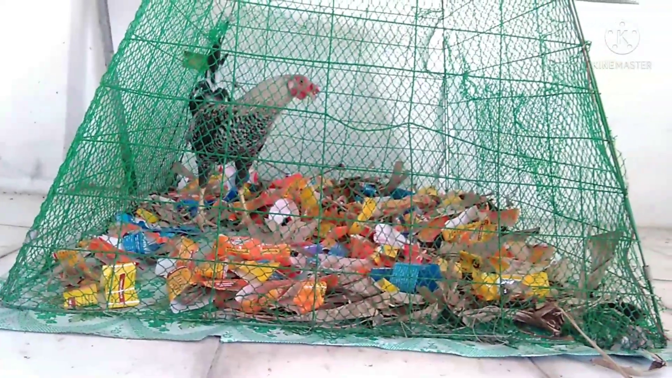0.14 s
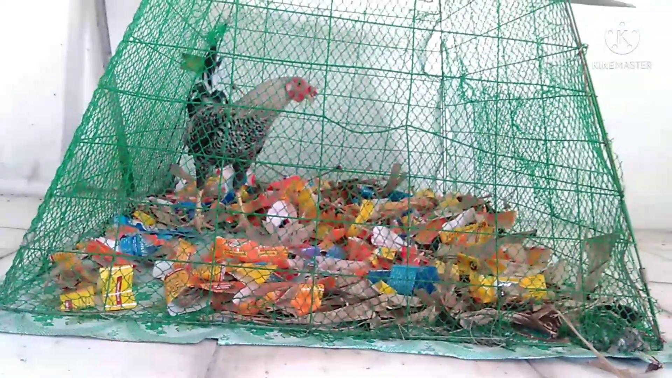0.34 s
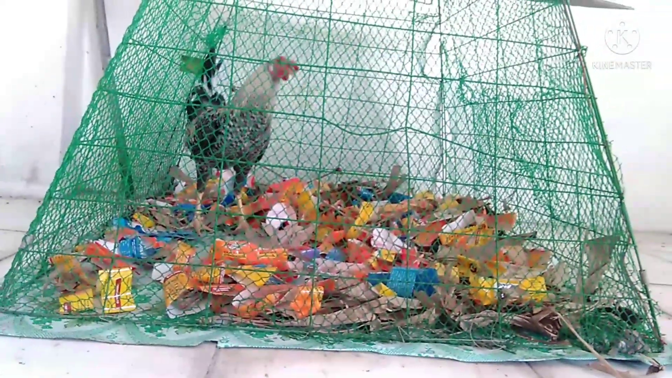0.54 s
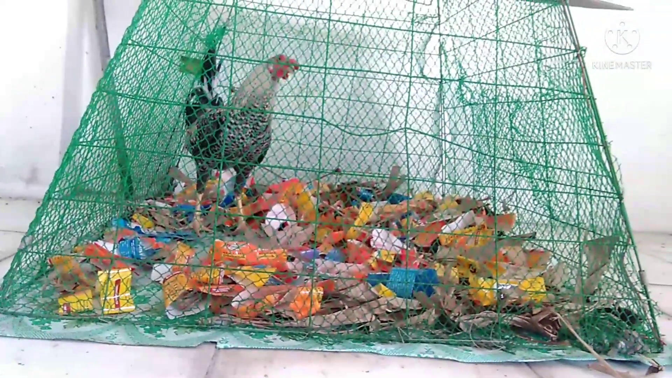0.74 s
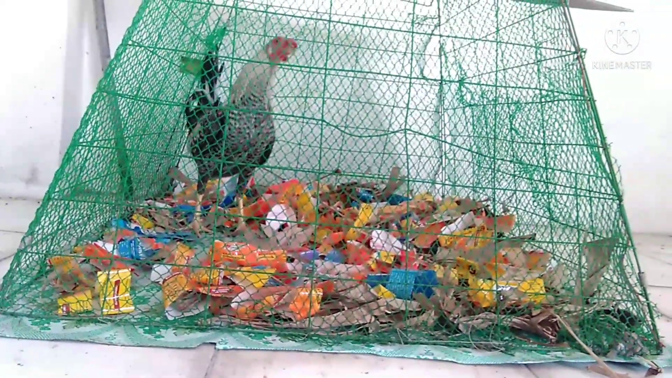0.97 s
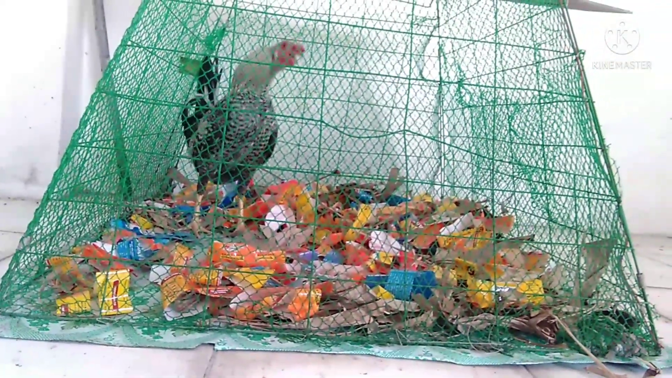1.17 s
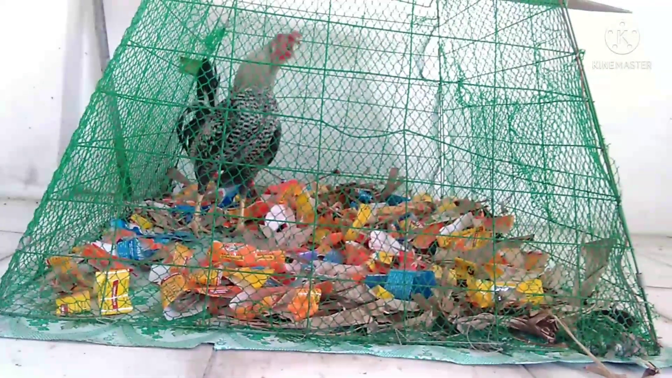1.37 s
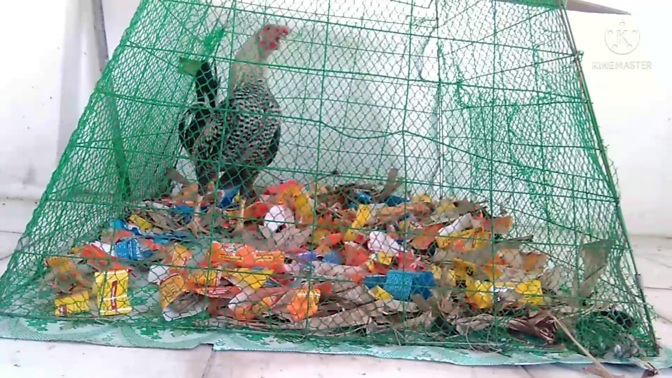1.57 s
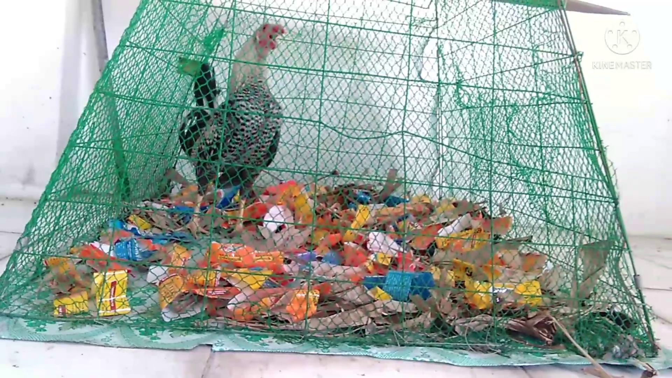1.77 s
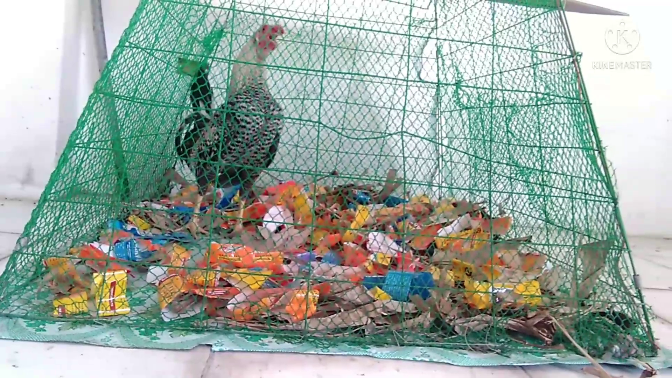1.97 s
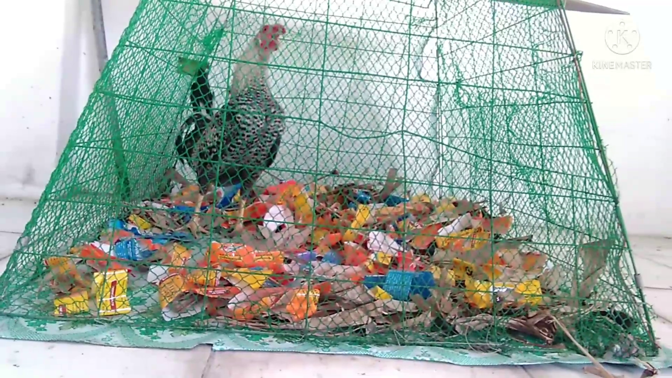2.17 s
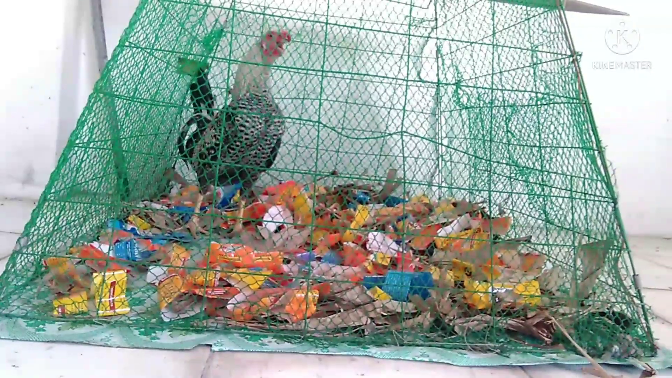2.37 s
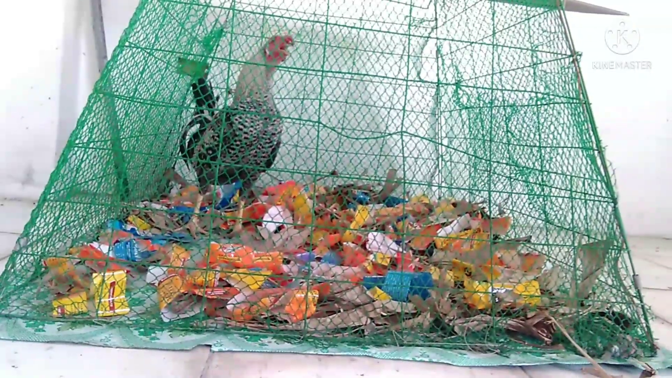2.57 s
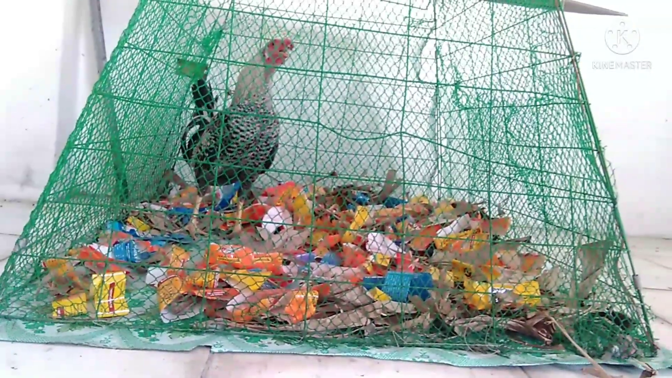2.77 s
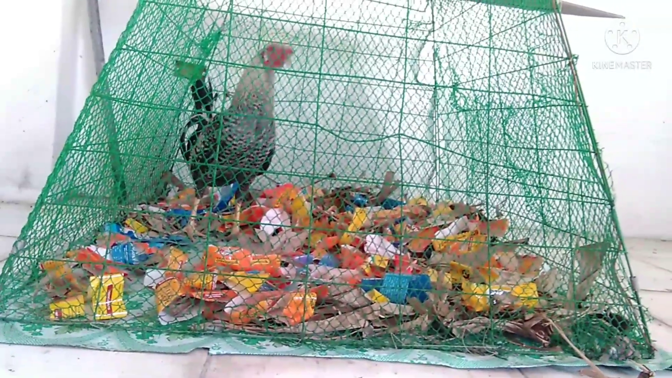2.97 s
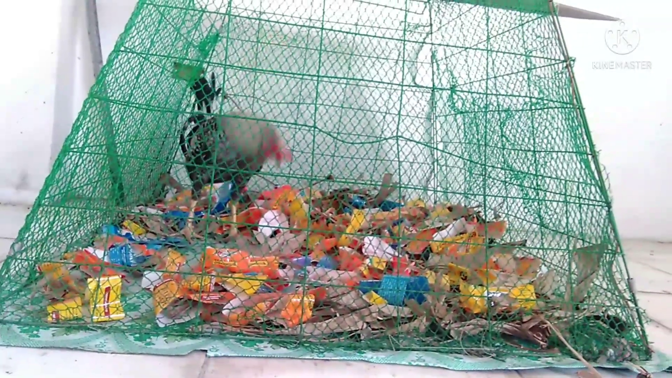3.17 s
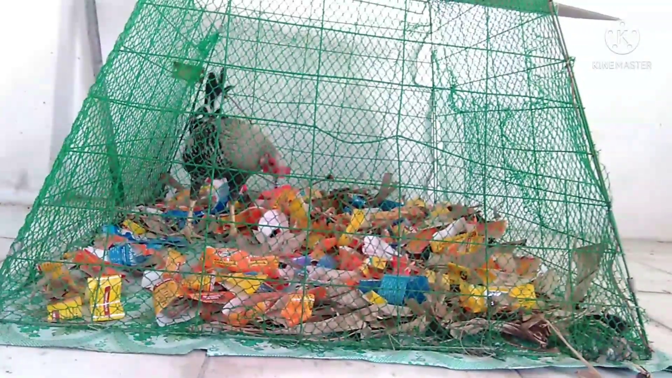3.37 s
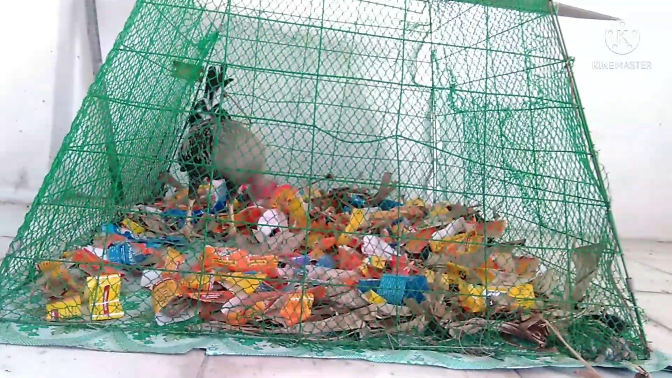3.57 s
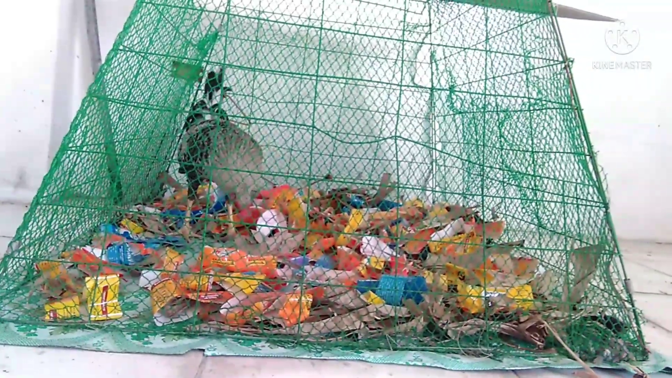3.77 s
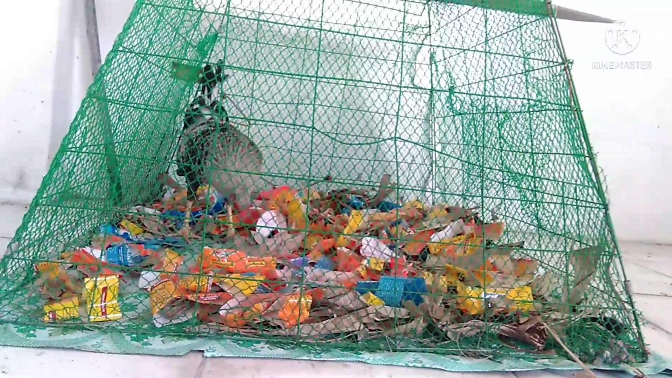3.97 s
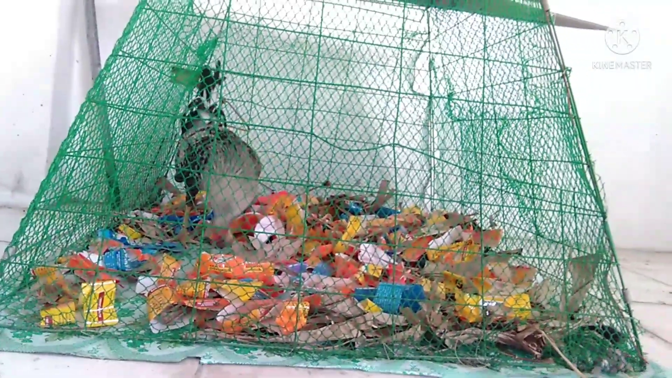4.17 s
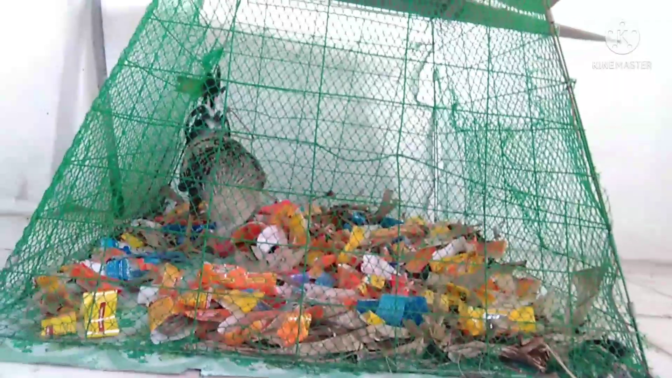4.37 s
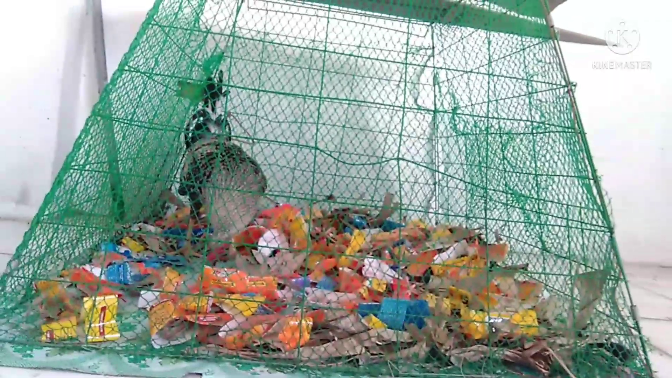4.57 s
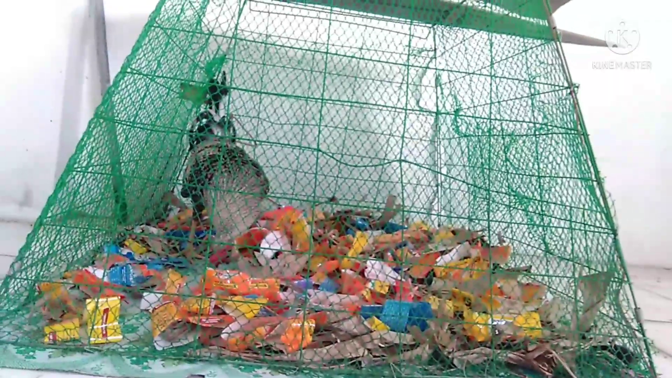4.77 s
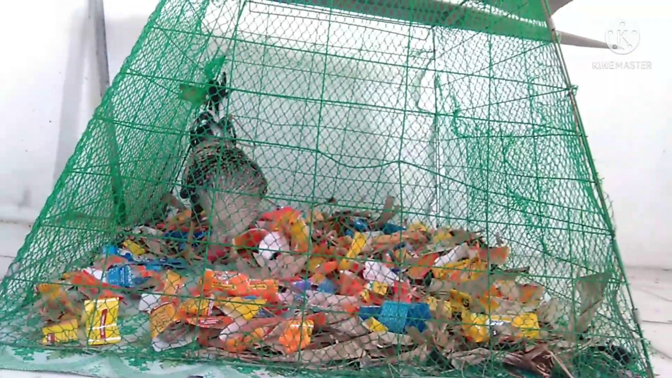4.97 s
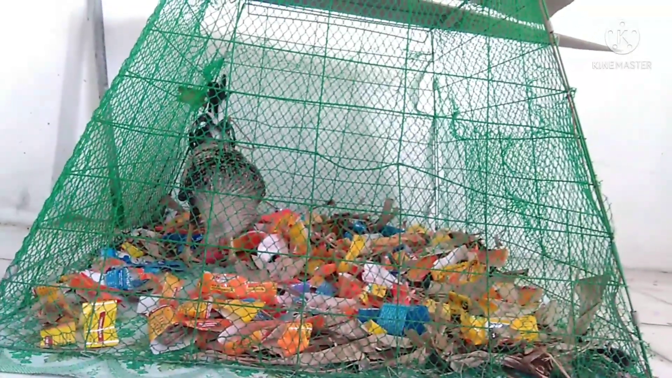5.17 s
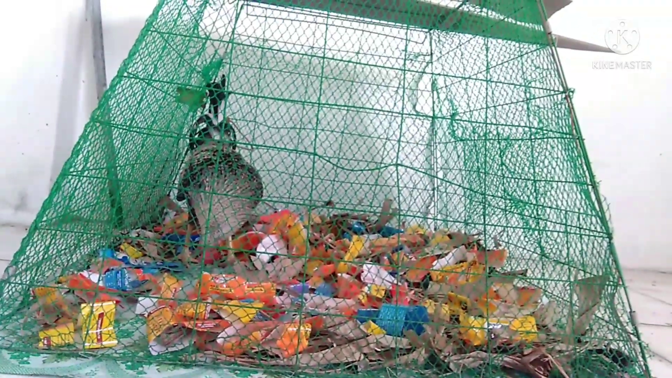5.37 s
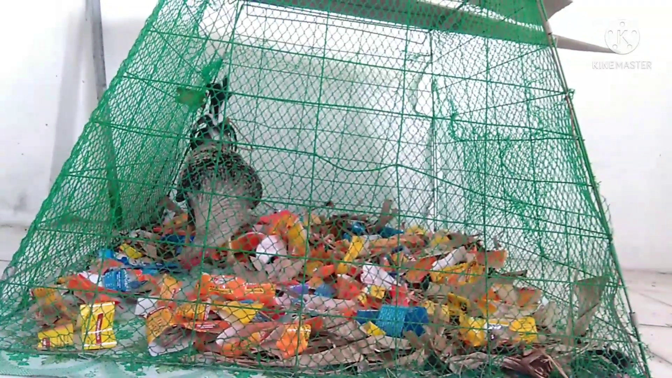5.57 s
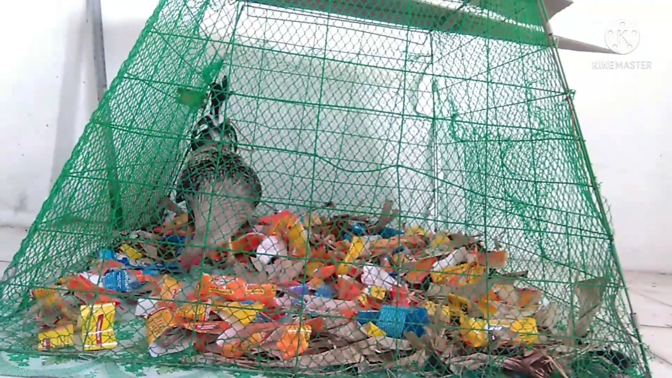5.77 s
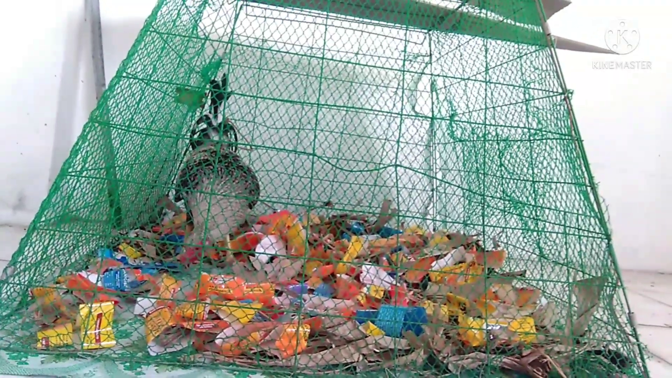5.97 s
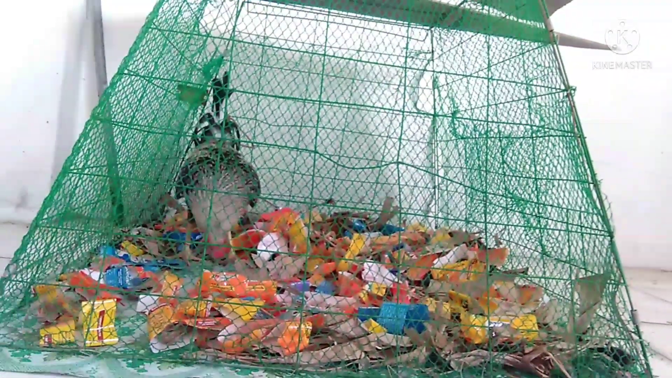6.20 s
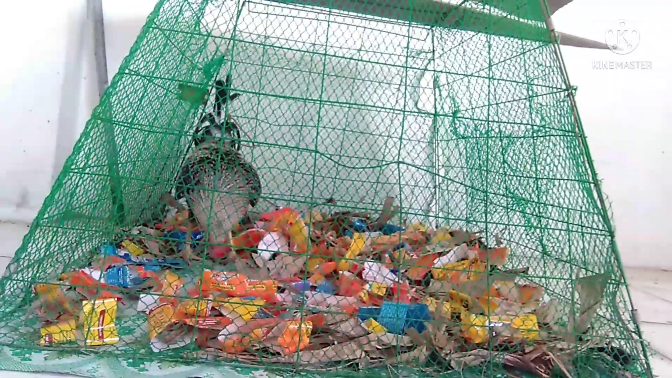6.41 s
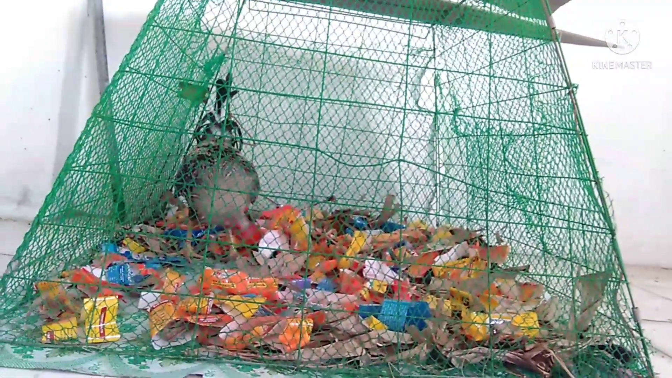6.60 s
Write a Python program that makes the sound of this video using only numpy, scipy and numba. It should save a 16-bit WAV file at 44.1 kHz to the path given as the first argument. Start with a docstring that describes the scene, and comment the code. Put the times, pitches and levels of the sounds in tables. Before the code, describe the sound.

After three tiny far bird chirps, one raspy, pitch-jumping rooster crow echoes around a hard-walled yard above steady low hum and airy wash.

```python
"""Rooster crowing in a hard-walled yard

A rooster in a wire pen crows once, a few metres from a phone, over a low hum and distant traffic wash.
Its syrinx sends partials through fixed throat resonances; notes jump in pitch, some hoarse, one long trill.
Decaying noise echoes from the walls blur them. A small far bird chirps first, as gliding sines, and faint
wavering tones come after the crow. The phone slightly lowers quiet sound, limits peaks and cuts the top."""
import sys
import numpy as np
from scipy import signal
from scipy.fft import rfft, irfft, next_fast_len
from scipy.io import wavfile
from scipy.ndimage import uniform_filter1d
from numba import njit

SR = 44100
rng = np.random.default_rng(int(sys.argv[2]) if len(sys.argv) > 2 else 0)


def dump(signal):
    """Clip the signal to [-1, 1] and save it as 16-bit WAV at the path in sys.argv[1]."""
    limited = np.clip(np.atleast_2d(signal).T, -1, 1)
    pcm = np.round(limited * 32767).astype(np.int16)
    wavfile.write(sys.argv[1], SR, pcm)


N = 292912
SIZE = next_fast_len(2 * N)  # padded transform length
HZ = np.fft.rfftfreq(SIZE, 1 / SR) + 1e-9  # never zero, so that its logarithm exists


def undb(db):
    """Amplitude ratio: each 20 dB is a factor of ten."""
    return 10 ** (np.asarray(db) / 20)


def level(x, db):
    """Root-mean-square level: scale a signal to a given effective amplitude."""
    return x * undb(db) / np.sqrt(np.mean(x ** 2))


def on_hz(table):
    """Spectral interpolation: join (Hz, value) points on a log-frequency axis."""
    hz, value = np.transpose(table)
    return np.interp(np.log(HZ), np.log(hz), value)


def colour(x, gain):
    """Linear filtering: convolution in time is multiplication in frequency."""
    return irfft(rfft(x, SIZE) * gain, SIZE)[..., :N]


def walk(rate):
    """Band-limited chance: twice-averaged noise of unit rms that changes about rate times a second."""
    k = max(int(SR / rate), 1)
    smooth = uniform_filter1d(uniform_filter1d(rng.standard_normal(N), k), k)
    return level(smooth, 0)


def bands(count, lo_hz, hi_hz):
    """Filter bank: overlapping triangles on a log-frequency axis that add up to one."""
    centres = np.geomspace(lo_hz, hi_hz, count)
    weights = [np.interp(np.log(HZ), np.log(centres), row) for row in np.eye(count)]
    return list(zip(centres, weights))


@njit
def follow(x, attack, release):
    """Envelope detection: a one-pole smoother with separate rates for rise and fall."""
    e, out = 0., np.empty(len(x))
    for i in range(len(x)):
        e += (x[i] - e) * (attack if x[i] > e else release)
        out[i] = e
    return out


def town():
    """Partial coherence: hum and wash reach the right port first; above the bass they grow diffuse."""
    # Spectrum of hum and wash. Each row: frequency in Hz, relative density in dB.
    town_spectrum = [(15, -65), (25, -36), (40, -31), (52, -24), (62, -14.5), (87, -8), (136, -8),
                     (285, -13), (335, -10), (436, -14.5), (740, -9.5), (891, -13.5), (1130, -8.5),
                     (1550, -18), (3170, -27), (4030, -36.5), (9150, -47.5), (14000, -60.5)]
    # Denser regions of hum and wash. Each row: centre in Hz, width in Hz, added density in dB.
    dense_regions = [(94.6, 5.5, 4.5), (136.7, 17, 7.5), (1094, 27.5, 5.5), (2130, 680, 7),
                     (3450, 230, 2.5)]
    # Band levels; the treble dips early and all is fuller later.
    # Each row: time in seconds, then relative bass, middle, treble and top level in dB.
    band_levels = [(0, -4, -20, -6.5, 6.5), (.33, -3.5, -19.5, -15.5, 1.5), (.47, -4, -20, -24, -13),
                   (.75, -5, -22, -30, -9), (.95, -4, -22.5, -14, -7.5), (2.4, -10.5, -14.5, -12, 7),
                   (3.1, -1.5, -19.5, -2.5, 7), (4.002, -3.5, -15, -1.5, 5.5), (4.85, -3, -11.5, 1.5, 5.5),
                   (5.149, 0, -14.5, 1, 7), (5.8, -1.5, -11, 2.5, 7), (6.2, -0.5, -12, 3, 8),
                   (6.64, 0, -12, 3.5, 9.5)]
    # Frequencies in Hz to which those four levels belong.
    level_hz = [173, 1760, 4050, 9000]
    lag = 16  # samples by which the left port hears the shared part later
    shape_db = on_hz(town_spectrum)
    for hz, width, db in dense_regions:
        shape_db = shape_db + db * np.exp(-.5 * ((HZ - hz) / width) ** 2)
    aimed, left, right = rng.standard_normal((3, N))
    # share of the power common to both ports
    coherent = np.clip(on_hz([(200, 1.0), (700, 0.69), (2000, 0.059), (9000, 0.028)]), 0, 1)
    shared = rfft([np.roll(aimed, lag), aimed], SIZE) * np.sqrt(coherent)
    diffuse = rfft([left, right], SIZE) * np.sqrt(1 - coherent)
    both = (shared + diffuse) * undb(shape_db)
    both = both * undb(-24) / np.std(irfft(both, SIZE)[:, :N])  # rms before the band levels
    seconds, *columns = np.transpose(band_levels)
    out = 0
    for centre, weight in bands(count=14, lo_hz=40.0, hi_hz=10300):
        db = [np.interp(np.log(centre), np.log(level_hz), row) for row in np.transpose(columns)]
        flicker_db = 0.97 * walk(5.3)
        gain = undb(np.interp(np.arange(N) / SR, seconds, db) + flicker_db)
        out = out + irfft(both * weight, SIZE)[:, :N] * gain
    return out


def chirps():
    """Frequency glide: short soft sine whistles of a small far bird sag a little under a half-sine swell."""
    # Each row: start in seconds, length in seconds, starting pitch in Hz, peak level in dB.
    whistles = [(0.022, 0.027, 2800, -51), (0.056, .02, 2760, -45), (0.094, 0.04, 2780, -49)]
    t, out = np.arange(N) / SR, 0
    for start, length, hz, db in whistles:
        along = np.clip((t - start) / length, 0, 1)
        cycles = hz * np.cumsum(1 - 0.027 * along) / SR
        out = out + undb(db) * np.sin(np.pi * along) * np.sin(2 * np.pi * cycles)
    return out


def trill(t):
    """Frequency modulation: a flattened cosine moves the long note's pitch up and down."""
    # Each row: time in seconds, depth as a share of the pitch.
    trill_depth = [(1.96, 0), (2.02, .025), (2.12, .035), (2.24, .042), (2.35, .03), (2.41, 0)]
    rate_hz, top_s = 28, 2.2  # the pitch is about at its top at top_s
    swing = np.tanh(2 * np.cos(2 * np.pi * rate_hz * (t - top_s) + .5 * walk(12)))
    return np.interp(t, *np.transpose(trill_depth)) * swing


def second_voice(t):
    """Biphonation: a second, lower oscillation sounds in two hoarse early notes."""
    # Each row: start in seconds, end in seconds, pitch in Hz, amplitude share.
    second_notes = [(1.38, 1.49, 779.5, 0.61), (1.58, 1.694, 787.6, 1.28)]
    wobbling_s = np.cumsum(1 + .04 * walk(99)) / SR
    flutter = undb(4 * walk(100))
    out = 0
    for start, end, hz, share in second_notes:
        out = out + share * (t >= start) * (t < end) * flutter * np.cos(2 * np.pi * hz * wobbling_s)
    return out


def overtones(phase, hz, beak_db, rasp, valve):
    """Harmonic series: partials 2 to 17 fall with order; the upper ones flicker and drift separately."""
    shimmer_db, shimmer_rad = 4, 1.0
    odd_db = -0.5  # odd partials are weaker than even ones
    out = 0
    for k in range(2, 18):
        shake = np.clip((k - 3) / 3, 0, 1)
        flicker = undb(shake * shimmer_db * walk(60))
        gain = undb(beak_db - 5.98 * np.log2(k) + odd_db * (k % 2)) * (rasp if k > 2 else 1)
        # the throat spreads the phases by k * k, so the puffs are not spiky
        wave = np.cos(k * phase + k * k + shake * shimmer_rad * walk(136))
        out = out + flicker * valve * gain * wave * (k * hz < 16000)
    return out


def throat(source, t):
    """Source-filter principle: fixed resonances shape the voice, first with the neck bent, then straight."""
    # Neck still bent. Each row: frequency in Hz, gain in dB.
    bent_gain = [(300, -34), (650, -8), (850, 0), (1000, 2.5), (1230, 3), (1450, 17), (1800, 13), (2400, 9),
                 (2700, -26), (3100, -7), (3800, -26), (4600, -6.5), (5700, -1), (7200, -11.5),
                 (8500, -15.5), (11500, -10), (14000, -31)]
    # Neck straight. Each row: frequency in Hz, gain in dB.
    straight_gain = [(300, -60), (650, 1.5), (850, 9), (1200, 10), (1650, 16.5), (2000, 14.5), (2200, 10.5),
                     (2500, -3.5), (2750, 5), (3100, -7.5), (3350, 0.5), (3600, 10.5), (3900, -4),
                     (4060, -62), (4300, 2), (4550, -10.5), (4800, -2), (5050, -16.5), (5450, -0.5),
                     (5800, 2.5), (6150, -4), (6400, -9.5), (6700, 1.5), (7450, -8), (7900, 1), (8300, -6),
                     (8700, -9), (9300, -3.5), (10000, -8), (10700, -4), (11500, -14.5), (14000, -12)]
    bent = t < 1.692  # the neck straightens here, in seconds
    return colour(source * bent, undb(on_hz(bent_gain))) + colour(source * ~bent, undb(on_hz(straight_gain)))


def wheeze():
    """Turbulence: air rushing through the whole crow is filtered noise."""
    # Each row: frequency in Hz, relative level in dB.
    wheeze_spectrum = [(250, -8.5), (500, -8), (1300, -4.5), (2300, 9.5), (3000, -8), (4200, -10),
                       (7000, -42), (14000, -47)]
    return level(colour(rng.standard_normal(N), undb(on_hz(wheeze_spectrum))), -15.5)


def rooster():
    """Self-sustained oscillation: membrane puffs once a cycle; hoarse notes wobble and carry air noise."""
    # Notes of the crow. Each row: start in seconds, end in seconds, relative level at the start in dB,
    # the same at the end in dB, hoarseness from 0 to 1, beak opening as gain of the overtones in dB,
    # rasp as gain of the air noise and of the partials from the third up in dB.
    notes = [(1.384, 1.493, -4, -3.5, 0.27, -2.5, 8), (1.489, 1.551, -2.5, -14.5, 0.12, 9.5, -1.5),
             (1.56, 1.578, -23, -20, .2, 13, -2), (1.587, 1.69, -14, -13, 0.32, -7, 4.5),
             (1.692, 1.745, -16, -16, .12, 13.5, -1.5), (1.746, 1.801, -4, -8.5, 0.1, -3.5, 11),
             (1.799, 1.847, -9.5, -11.5, 0.24, 6.5, -4), (1.856, 1.93, -26.5, -19.5, 0.05, 14.5, 3),
             (1.929, 2.12, -9.5, -13, 0.19, 7, 0.5), (2.107, 2.423, -13, -7.5, 0.17, 7, 0),
             (2.434, 2.604, -21, -8.5, 0.12, 8.5, -3.5), (2.605, 2.679, -11.5, -3, 0, 6, 1),
             (2.683, 2.79, -20.5, -19, 0.02, 22, -2.5), (2.797, 2.845, -18.5, -20.5, 0, 18, 0),
             (2.846, 2.899, -4.5, -15.5, 0.07, 6, 3.5), (2.897, 2.952, -3, -1.5, 0.06, -28, -8.5)]
    # Pitch, jumping between notes. Each row: time in seconds, pitch in Hz.
    pitch_points = [(1.39, 955), (1.41, 975), (1.488, 972), (1.49, 863), (1.52, 844), (1.548, 857),
                    (1.55, 660), (1.578, 720), (1.58, 950), (1.69, 960), (1.696, 915), (1.74, 1005),
                    (1.765, 1060), (1.805, 1050), (1.818, 945), (1.842, 910), (1.845, 682), (1.88, 657),
                    (1.925, 726), (1.93, 917), (1.95, 920), (2.0, 962), (2.09, 985), (2.2, 965), (2.3, 945),
                    (2.36, 930), (2.425, 897), (2.428, 710), (2.44, 660), (2.555, 659), (2.6, 735),
                    (2.602, 842), (2.79, 834), (2.83, 822), (2.86, 803), (2.895, 780), (2.9, 825),
                    (2.92, 815), (2.925, 745), (2.955, 732)]
    slur_s, attack_s = 0.023, .012  # slide of level, beak, hoarseness and rasp; swell of the first note
    flutter_db = 14  # how much the lowest partial shakes at full hoarseness
    sum_tone, air_db = 0.95, 5
    t = np.arange(N) / SR
    start, end, first_db, last_db, *columns = np.transpose(notes)
    note = np.clip(np.searchsorted(start, t) - 1, 0, None)
    along = np.clip((t - start[note]) / (end - start)[note], 0, 1)

    def slur(x):
        """Smoothing: a moving average slides a value from note to note."""
        return uniform_filter1d(x, max(int(slur_s * SR), 1))

    db = slur(first_db[note] + along * (last_db - first_db)[note])
    hoarse, beak_db, rasp_db = (slur(column[note]) for column in columns)
    hoarse, rasp = np.clip(hoarse, 0, 1), undb(rasp_db)
    sounding = 1. * ((t >= start[note]) & (t < end[note]))
    swell = np.clip((t - start[0]) / attack_s, 0, 1) ** 2
    on = uniform_filter1d(sounding, int(.003 * SR)) * swell

    bend = trill(t)
    hz = np.interp(t, *np.transpose(pitch_points)) * (1 + bend)
    jitter = hoarse * (.045 * walk(450) + .025 * walk(120) + .015 * walk(30))
    phase = 2 * np.pi * np.cumsum(hz * (1 + jitter)) / SR
    puff_size = undb(hoarse * 9 * walk(180))
    # the two voices meet in one valve, so their sum and difference tones appear
    other = second_voice(t)
    valve = 1 + 0.1 * other
    lowest = undb(flutter_db * hoarse * (walk(510) - 1)) * np.cos(phase)
    tone = lowest + other + sum_tone * other * np.cos(phase)
    tone = tone + overtones(phase, hz, beak_db, rasp, valve)
    # now and then every other cycle is weaker, which adds lines half-way between the partials
    halving = np.clip(walk(35) - .5 + 40 * bend, 0, 2)
    halves = 1 + 3.2 * hoarse * halving * np.cos(phase / 2)
    # noise of the hoarse membrane, pulsing with each puff
    air = undb(air_db) * rasp * hoarse * (1 + np.cos(phase)) * rng.standard_normal(N)
    source = on * undb(db) * puff_size * (halves * tone + air)
    return throat(source, t) + on * wheeze()


def yard(dry):
    """Reverberation: dense wall echoes differ at each port and decay at a rate set by frequency."""
    # Each row: frequency in Hz, time to decay by 60 dB in seconds, echo gain in dB.
    echo_table = np.array([(300, 1.18, 1), (812, 1.44, 5), (1020, 1.85, -1), (1690, 1.46, -4.5),
                           (3420, 0.73, 5), (5430, 0.97, 4), (8200, 0.97, 5), (12700, 0.49, 9)])
    yard_db = -0.5  # echo energy against the direct sound, before the gains of the table
    t = np.arange(2 * SR) / SR
    noise = rfft(rng.standard_normal((2, len(t))), SIZE)
    echo = 0
    for centre, weight in bands(count=8, lo_hz=278, hi_hz=13000):
        t60 = np.interp(np.log(centre), np.log(echo_table[:, 0]), echo_table[:, 1])
        echo = echo + irfft(noise * weight, SIZE)[:, :len(t)] * undb(-60 * t / t60)
    echo = echo * np.clip(t / .015, 0, 1)  # first walls are a few metres off
    echo = echo * undb(yard_db) / np.sqrt(np.sum(echo ** 2) / 2)
    return colour(dry, undb(on_hz(echo_table[:, ::2])) * rfft(echo, SIZE))


def tones():
    """Phase modulation: chance phase blurs faint tones that drift in pitch and come and go."""
    # Each row: pitch in Hz, middle level in dB, end in seconds.
    faint_tones = [(1103, -50, 6.3), (2410, -61, 5.3), (3180, -64, 6)]
    start_s, waver, swell_db = 3.7, .02, 3  # waver is a share of the pitch
    t, out = np.arange(N) / SR, 0
    for hz, db, end in faint_tones:
        phase = 2 * np.pi * hz * np.cumsum(1 + waver * walk(3)) / SR + 2.1 * walk(76)
        gain = np.clip((end - t) / .3, 0, 1) * undb(db + swell_db * walk(6))
        port_drift = np.array([[0], [1]]) * walk(16)  # only the right port's phase drifts apart
        out = out + gain * np.sin(phase + port_drift)
    return out * np.clip((t - start_s) / 0.27, 0, 1)


def scene():
    """Superposition: crow and echoes, town, chirps and tones add up at two microphone ports."""
    # Each row: frequency in Hz, left minus right level of the crow in dB.
    port_balance = [(300, 9), (700, -1), (1500, 3), (2300, -1), (4000, 1.5), (9000, 4.5), (13000, -1.5)]
    bird = rooster()
    near = np.array([bird, np.roll(bird, 5)])  # reaches the right port 5 samples later
    ports = undb(np.array([[1], [-1]]) * on_hz(port_balance) / 2)  # the left port faces the pen
    crow = undb(-12) * colour(near + yard(bird), ports)
    return crow + town() + chirps() + tones()


def record(dry):
    """Dynamic range control: mild downward expansion, peak limiting, clipping and a steep low-pass."""
    threshold_db, ratio, release_s = -31, 0.956, 0.44  # a ratio below 1 lowers what is under the threshold
    top_hz = 14130
    ahead = np.roll(np.abs(dry).max(axis=0), -int(.002 * SR))  # looks 2 ms ahead
    envelope = follow(ahead, 1 / (.0015 * SR), 1 / (release_s * SR))
    gain = np.minimum(1, (undb(threshold_db) / (envelope + 1e-9)) ** (1 - 1 / ratio))
    peak = follow(ahead * gain, 1 / (.0006 * SR), 1 / (.03 * SR))
    limiter = np.minimum(1, .85 / (peak + 1e-9))
    held = dry * gain * limiter
    cut = signal.ellip(12, .2, 85, top_hz, fs=SR, output="sos")
    return signal.sosfilt(cut, np.clip(held, -1, 1))


dry = scene()
out = record(dry)
dump(out)
```